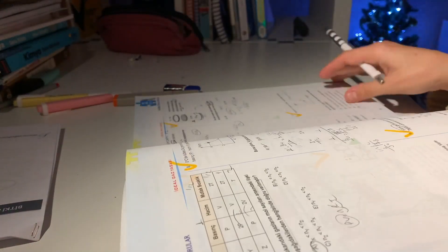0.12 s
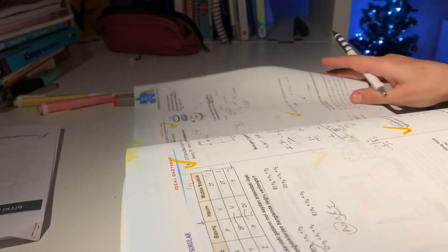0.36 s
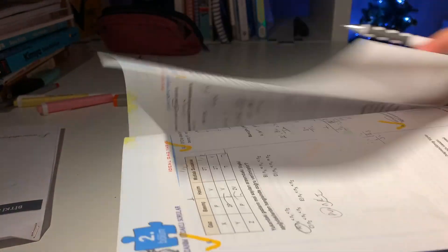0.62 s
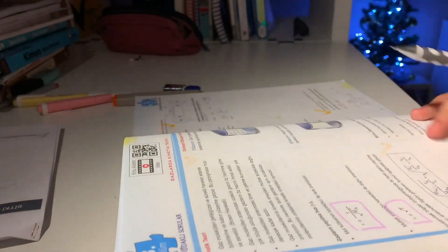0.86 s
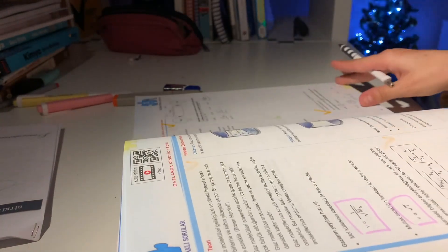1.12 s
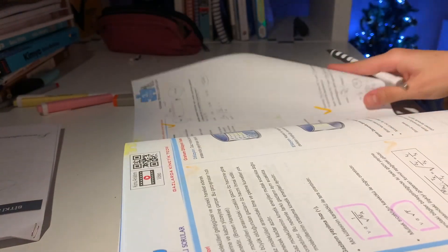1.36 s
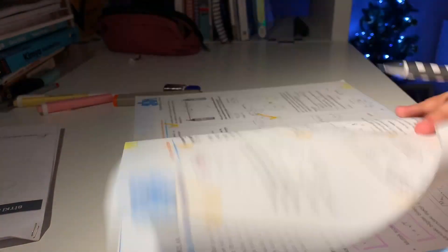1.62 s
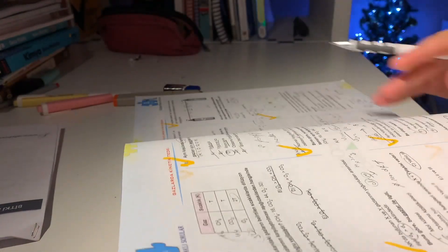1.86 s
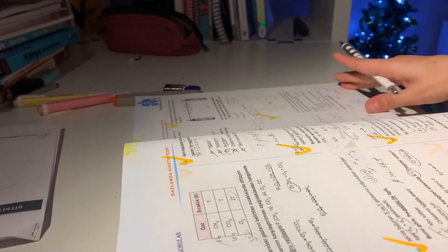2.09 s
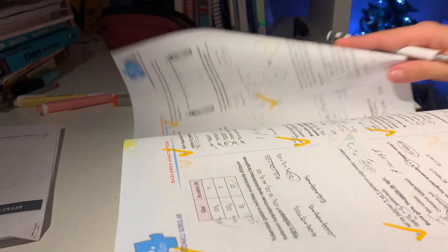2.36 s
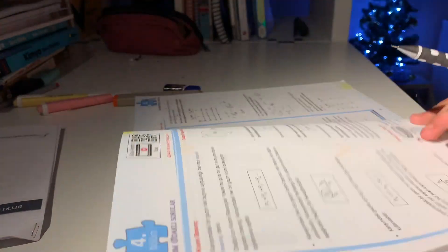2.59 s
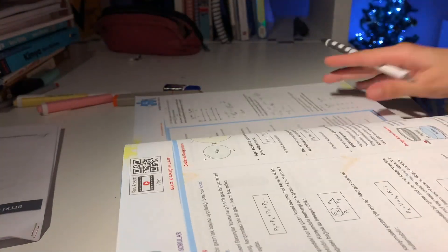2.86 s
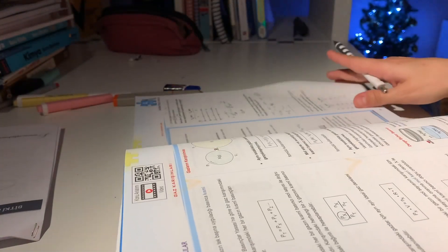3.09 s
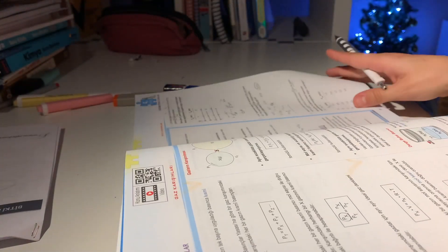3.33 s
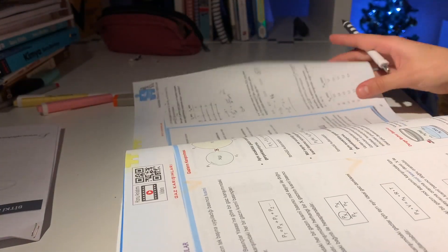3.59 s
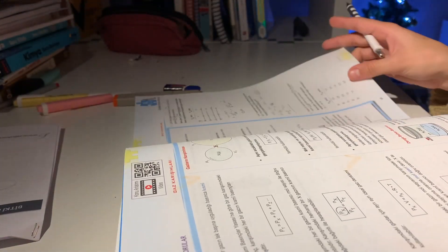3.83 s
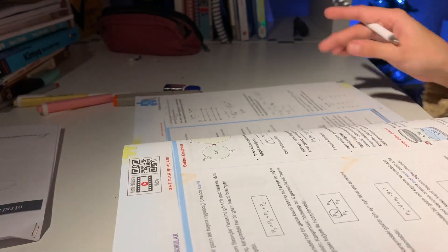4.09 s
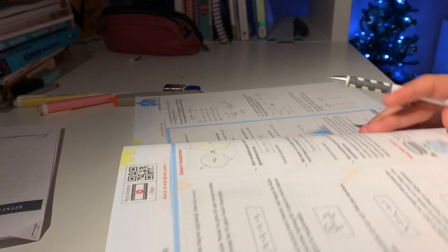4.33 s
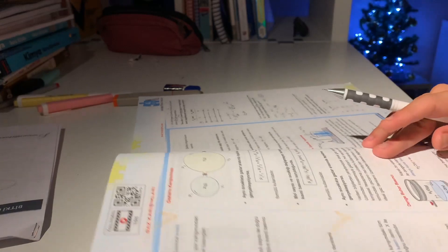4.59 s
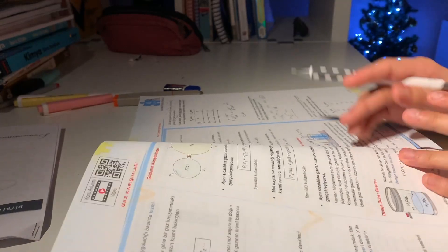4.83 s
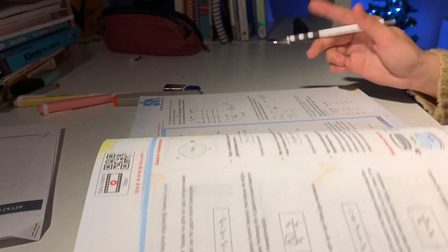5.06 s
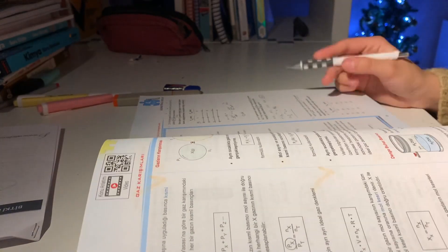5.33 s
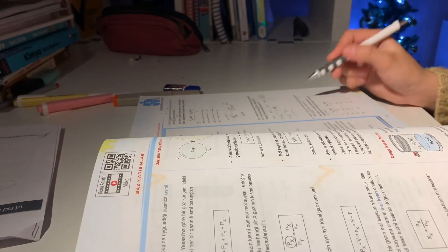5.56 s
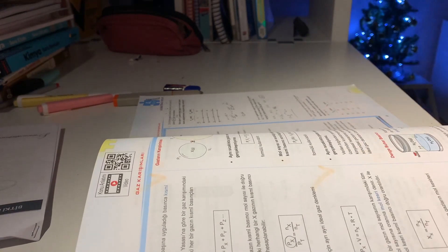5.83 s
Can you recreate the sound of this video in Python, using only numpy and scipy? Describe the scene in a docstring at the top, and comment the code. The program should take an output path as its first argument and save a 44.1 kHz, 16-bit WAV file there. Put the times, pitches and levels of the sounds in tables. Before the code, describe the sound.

Close, dry indoor sound of paper: quick page turns with bright crackles and whooshing rustle, dull low bumps as sheets and hand meet the desk, and fine skin hiss as fingers brush the surface. The first half is lively and loudest around the second and third flips; later come a crisp flick, smaller rustles and soft strokes, fading to faint room hum.

```python
"""At a desk in a house, close to a two-port microphone: a hand with a pen turns and smooths thick book pages.
Fingers hiss and pages drag as granular noise; the bending sheet rustles in coarser grains.
Creases snap as short rings in a flurry of noise, and paper edges scrape in narrow bands of noise.
Fallen pages and the hand thump the desk as low waves sliding down in pitch.
Behind them a low hum of the house, shaped noise, swells slowly under a faint steady hiss."""
import sys
import numpy as np
from scipy import signal
from scipy.fft import rfft, irfft
from scipy.io import wavfile
from scipy.ndimage import uniform_filter1d

SR = 44100
rng = np.random.default_rng(int(sys.argv[2]) if len(sys.argv) > 2 else 0)


def elevation(decibels):
    """Turn decibel levels (scalar or array-like) into linear amplitude ratios."""
    levels = np.asarray(decibels, float)
    return 10 ** (levels / 20)


def store_wav(level_fs):
    """Save 16-bit WAV to argv[1]."""
    pcm = np.round(np.clip(np.atleast_2d(level_fs), -1, 1) * 32767)
    wavfile.write(sys.argv[1], SR, pcm.T.astype(np.int16))


N = 261926  # samples in the scene

# Strokes of the hand over the paper: firmest pressure t/s, rise/s, fall/s,
# drag of page on page level/dB, skin hiss above the drag level/dB
STROKES = [(0.0, 0.025, .12, -62, 3), (.322, .09, 0.88, -60.5, 11.5), (.536, 0.015, 0.41, -52, 2.5),
           (0.734, 0.16, 0.11, -50, 9.5), (.936, 0.15, 0.035, -78, 7), (1.249, 0.032, 1, -60, 10.5),
           (1.487, 0.036, 0.24, -47.5, -3.5), (1.561, 0.036, 0.25, -52.5, 15), (1.65, 0.36, .2, -51, 2.5),
           (1.846, .1, 0.048, -74.5, 7), (1.926, 0.087, 0.094, -84, 5), (2.005, .04, 0.097, -91.5, 12.5),
           (2.139, 0.014, 0.53, -60.5, 3.5), (2.242, 0.098, 0.22, -55, 14), (2.4, 0.29, .1, -62, 11),
           (2.494, 0.063, 0.24, -47.5, 10), (2.829, 0.51, 0.22, -62.5, 2), (2.941, .1, 0.63, -67, 9.5),
           (3.137, 0.097, 0.085, -57, 7), (3.3, 0.15, 0.057, -71, -3), (3.407, 0.05, 0.23, -63, -1),
           (3.52, .12, 0.19, -56.5, -6), (3.6, 0.28, 0.064, -70, 18), (3.636, .015, 0.13, -45, -1.5),
           (3.794, 0.15, 0.21, -61.5, -8), (4.001, 0.39, 0.11, -71.5, 5.5), (4.081, 0.078, 0.075, -68, -7),
           (4.23, 0.15, .25, -70.5, 1.5), (4.34, 0.092, 0.15, -50, 5.5), (4.457, 0.072, 0.11, -61.5, -2.5),
           (4.63, 0.35, 0.77, -64, 3.5), (4.745, 0.027, .2, -67.5, 11.5), (4.812, 0.16, 0.085, -55.5, 4.5),
           (5.013, 0.15, 0.25, -56, 4), (5.31, 0.13, 0.14, -64.5, -3), (5.365, 0.15, 0.027, -72, -8)]
# Bends of the sheet, each a rustle: sharpest bend t/s, rise/s, fall/s, level/dB
BENDS = [(0.0, .02, 0.17, -64), (.51, 0.36, 0.11, -63), (.534, 0.04, 0.28, -47), (.736, 0.44, .12, -50.5),
         (.92, .3, .2, -85), (1.22, 0.26, .2, -89), (1.45, 0.34, .1, -64), (1.485, 0.054, 0.032, -36.5),
         (1.639, 0.35, 0.1, -43), (1.846, 0.12, .12, -71.5), (1.926, .12, .15, -71.5),
         (2.195, .09, 0.13, -67.5), (2.4, 0.13, 0.087, -45.5), (2.495, 0.04, 0.16, -42),
         (2.565, 0.24, 0.06, -41), (2.829, .3, 0.057, -58), (2.941, .12, 0.21, -63.5),
         (3.138, 0.086, 0.13, -63.5), (3.32, .17, 0.11, -66), (3.407, 0.11, .2, -62.5),
         (3.6, 0.28, 0.076, -58), (3.643, 0.028, 0.085, -39.5), (3.794, 0.12, 0.25, -58),
         (4.001, 0.2, 0.41, -66.5), (4.218, 0.4, 0.24, -69), (4.34, 0.078, 0.16, -47),
         (4.457, .1, .18, -76), (4.62, .3, .3, -69), (4.8, 0.37, 0.084, -52), (5.014, .2, .3, -63),
         (5.105, 0.74, 0.18, -55.5), (5.31, 0.6, 0.21, -62.5), (5.621, .5, 0.9, -76.5)]
# Colour of skin sliding on paper: f/Hz, relative density level/dB per Hz
SKIN_SPECTRUM = [(1500, -35.5), (5000, -27.5), (7500, -0.5), (9000, 0.5), (11000, -0.5), (13500, 3),
                 (15800, -11)]
# Colour of page dragging on page: f/Hz, relative density level/dB per Hz
DRAG_SPECTRUM = [(600, -20.5), (1800, -3), (3000, 5), (4300, 6), (6500, -1.5), (9000, -9), (15800, -26.5)]
# Colour of the rustling sheet: f/Hz, relative density level/dB per Hz
SHEET_SPECTRUM = [(150, -27), (400, -1.5), (900, -2.5), (1600, -3), (2400, -3), (4000, -17.5),
                  (16000, -49.5)]
# Creases that flip: onset t/s, level/dB, ring f/Hz, treble relative level/dB, decay of the flurry/ms
SNAPS = [(0.532, -16, 2060, -12.5, 1.3), (0.691, -45, 1639, -22, 14), (0.727, -36.5, 2410, -4, 11),
         (0.739, -34, 2520, 4, 2), (0.747, -39.5, 1600, 14, 2), (0.934, -68.5, 970, 16.5, 4.1),
         (1.453, -31.5, 1370, -25.5, 2.7), (1.480, -12, 1917, -6, 2.56), (1.549, -40, 1280, 5.5, 5.2),
         (1.622, -28.5, 1550, -4.5, 7.2), (1.654, -37, 2540, -17.5, 3.1), (1.6814, -26.5, 2480, 9.5, 1.5),
         (1.705, -37.5, 1080, -22, 4.3), (1.914, -50.5, 550, -15, 7.7), (1.995, -58, 970, -17, 3.2),
         (2.365, -53, 2440, -15.5, 6.5), (2.388, -47, 1500, -15, 4), (2.402, -42, 1980, -13, 5),
         (2.488, -20.5, 1136, -9.5, 4.9), (2.500, -31, 900, 0, 1.5), (2.524, -16.5, 900, -26.5, 2),
         (2.547, -29.5, 1690, -10, 2), (2.595, -43, 1160, 14, 4.4), (3.632, -30.5, 5470, 2.5, 9.2),
         (3.658, -34.5, 1010, -11, 6.2), (3.782, -34, 2070, -4.5, 2.9), (3.821, -40.5, 1515, -41.5, 5),
         (4.073, -46, 1070, 3, 1.8), (4.286, -45, 1060, -7, 10), (4.331, -35.5, 803, -17, 11),
         (4.387, -37, 2600, -3, 2.2), (4.391, -31.5, 1830, -20, 2.7), (4.446, -30, 1244, -6.5, 2.5),
         (4.451, -27, 603, -16, 3.5), (4.613, -39.5, 594, -6, 3.7), (4.793, -42, 600, -16, 10),
         (4.953, -58, 1000, -11, 7.9), (5.057, -35.5, 4000, -4, 1.7)]
# Modes of a flipped crease: factor on the ring frequency, relative level/dB, t60/cycles of the mode
CREASE_MODES = [(0.934, 2, 11.8), (1.525, -16.5, 4.7), (2.181, -3, 41), (0.732, -8.5, 14)]
# Paper edges scraping through a narrow gap that colours them: onset t/s, length/s, f/Hz, width/Hz, level/dB
SCRAPES = [(1.01, 0.06, 4290, 590, -81), (2.531, 0.041, 1600, 250, -46.5), (2.589, 0.13, 1200, 250, -57),
           (2.775, 0.16, 1180, 350, -56.5), (2.79, 0.078, 4500, 600, -66), (2.904, 0.21, 3600, 500, -64.5),
           (2.92, 0.18, 6300, 900, -62), (3.764, 0.11, 4470, 500, -59), (4.594, 0.14, 1240, 298, -63),
           (5.448, 0.25, 2155, 303, -76.5)]
# Pages and hand landing on the desk: onset t/s, level/dB, first f/Hz, last f/Hz, time to the top of the swing/ms
THUMPS = [(0.707, -43, 196, 83, 6.8), (1.628, -37, 263, 108, 14.3), (1.659, -37.5, 201, 61.6, 13.7),
          (1.811, -22.5, 199, 54.4, 18.5), (1.962, -42, 150, 57, 13), (2.487, -19, 1522, 146, 4.5),
          (2.511, -30, 266, 124, 5.2), (2.558, -35.5, 304, 163, 6.5), (2.668, -23, 224, 50.4, 22.5),
          (4.289, -36.5, 197, 66.7, 19.3), (5.338, -42, 119.3, 49.7, 17)]
# Resonances of the house: f/Hz, relative density level/dB per Hz
HUM_SPECTRUM = [(18, -49.5), (30, -17.5), (129, -1), (162, -6), (196, -7.5), (297, -7.5), (335, -11.5),
                (392, -13), (427, -19), (564, -24), (659, -31), (966, -22), (1680, -39), (1900, -62.5),
                (2470, -82), (4180, -120)]
# Swell of the hum: t/s, level/dB
HUM_LEVEL = [(0.0, -57), (1.06, -54), (1.751, -50), (2.07, -54.5), (2.28, -54), (2.58, -46), (2.94, -52.5),
             (4.33, -49.5), (5.94, -49)]
# Left-right likeness of the hum: f/Hz, likeness (0 to 1)
HUM_LIKENESS = [(30, 0.72), (130, 1), (290, 1), (640, 0.34), (1400, 0.17), (3000, 0.12)]
# Dying away of the room: f/Hz, t60/s
ROOM_DECAY = [(200, 0.29), (600, 0.13), (1500, 0.14), (4000, 0.052), (12000, 0.044)]
# Left-right likeness of the room: f/Hz, likeness (0 to 1)
ROOM_LIKENESS = [(200, 0.84), (700, 0.062), (3000, 0), (5500, 0.0056), (7500, 0.33), (16000, .85)]
# Phase by which the left port leads: f/Hz, lead/rad
PORT_LEAD = [(0, .45), (80, .45), (220, .25), (1120, .4), (2200, .5), (2900, 2), (3600, 1.5), (4600, 1.2),
             (6300, 0), (7670, -2.6), (8500, -3.14), (8960, -3.3), (10400, -6), (11600, -6.7),
             (12900, -9.1), (13600, -9.42), (14100, -9.6), (15100, -12.5), (16400, -12.6)]
# Left port over right port: f/Hz, level/dB
PORT_BALANCE = [(60, -1), (700, 0.5), (2000, 1.3), (4400, -2), (8000, -0.5), (16000, 0.5)]


def hand():
    """Skin hisses and pages drag almost evenly, sharing one fine grain; the sheet rustles in coarser grains."""
    drag_db, skin_db = np.transpose(STROKES)[3:, :, None]
    bend_db = np.transpose(BENDS)[3][:, None]
    ease_db = below_top(STROKES, roundness=1.35)
    # the skin hiss follows pressure more steeply than the drag; rest_db is a faint stirring between gestures
    skin_gain = summed(drag_db + skin_db - 1.63 * ease_db, rest_db=-85)
    drag_gain = summed(drag_db - ease_db, rest_db=-92)
    bend_gain = summed(bend_db - below_top(BENDS, roundness=0.88), rest_db=-89)
    friction = swishy(grains(2200, spread_db=1.1, ms=6.3), patchy_db=2.5)
    sheet = swishy(coloured(grains(700, spread_db=1.8, ms=3.2), SHEET_SPECTRUM), patchy_db=4.0)
    skin = evened(coloured(friction, SKIN_SPECTRUM)) * skin_gain
    drag = evened(coloured(friction, DRAG_SPECTRUM)) * drag_gain
    return skin + drag + evened(sheet) * bend_gain


def below_top(rows, roundness):
    """Each gesture climbs to its top, then falls: the dB it lies below; roundness 1 is pointed, 2 round."""
    t = np.arange(0, N + 64, 64) / SR
    top_s, rise_s, fall_s = np.array([row[:3] for row in rows]).T[:, :, None]
    before = (top_s - t) / np.maximum(rise_s, .005)
    after = (t - top_s) / np.maximum(fall_s, .005)
    span_db = 30  # level covered in one rise or fall time
    return span_db * np.where(t < top_s, before, after) ** roundness


def summed(levels_db, rest_db):
    """Gestures add by power over a resting level; returns a gain per sample."""
    gain = np.sqrt((elevation(levels_db) ** 2).sum(0) + elevation(rest_db) ** 2)
    return np.interp(np.arange(N), np.arange(len(gain)) * 64, gain)


def grains(per_s, spread_db, ms):
    """Noise under a flurry of random bursts, each decaying exponentially over ms."""
    size_db = spread_db * np.minimum(rng.exponential(1, N), 4)
    strikes = elevation(size_db) * (rng.random(N) < per_s / SR)
    bursts = signal.lfilter([1], [1, -np.exp(-1000 / (ms * SR))], strikes)
    return bursts * rng.standard_normal(N)


def swishy(x, patchy_db):
    """Tints a noise with patches that drift in time and frequency."""
    z = signal.stft(x, nperseg=256)[2]
    patches = uniform_filter1d(rng.standard_normal(z.shape), 5, 0)
    patches = evened(uniform_filter1d(patches, 24, 1))
    return signal.istft(z * elevation(patchy_db * patches), nperseg=256)[1][:N]


def snaps():
    """Each crease gives way within a moment and rings for a few cycles inside a short flurry of noise."""
    out, t = np.zeros(N), np.arange(4096) / SR
    noises = rng.standard_normal((len(SNAPS), 2, len(t)))
    for (s, db, hz, treble_db, ms), (low, high) in zip(SNAPS, noises):
        rise_ms = 0.095 + 0.28 * ms  # the crease gives way more slowly when its flurry is long
        rise = np.sin(np.pi / 2 * np.minimum(1000 * t / max(rise_ms, .1), 1)) ** 2
        after = np.maximum(t - rise_ms / 1000, 0)
        ring = np.zeros(len(t))
        for factor, mode_db, cycles in CREASE_MODES:
            decay = elevation(mode_db - 60 * after * hz * factor / cycles)
            ring += decay * np.sin(2 * np.pi * factor * hz * t + np.pi * factor ** 2)
        body = evened(coloured(low, [(hz / 3, -28), (hz, 0), (hz * 1.43, -8), (20000, -45)]))
        treble = evened(coloured(high, [(2500, -31), (5000, 57.5), (11000, 58), (16000, 50.5)]))
        fade = np.exp(-1000 * after / max(ms, .5))
        flurry = fade * (0.37 * body + 0.47 * elevation(treble_db) * treble)
        add(out, s, elevation(db) * rise * (0.42 * ring + flurry))
    return out


def scrapes():
    """Paper edges scrape as soft swells of noise in one narrow resonance each."""
    out = np.zeros(N)
    noises = rng.standard_normal((len(SCRAPES), SR // 2))
    for (s, length_s, hz, width, db), noise in zip(SCRAPES, noises):
        gap = [(hz - 2 * width, -30), (hz - width / 2, -3), (hz + width / 2, -3), (hz + 2 * width, -30)]
        count = round(length_s * SR)
        add(out, s, elevation(db) * evened(coloured(noise, gap))[:count] * np.hanning(count))
    return out


def thumps():
    """A bending wave whose fast highs come first: it slides down in pitch, with a faster ripple early on."""
    out, t = np.zeros(N), np.arange(SR // 4) / SR
    for s, db, first_hz, last_hz, ms in THUMPS:
        u = 1000 * t / ms  # 1 at the top of the swing
        hz = last_hz + (first_hz - last_hz) * np.exp(-u / 0.48)
        phase = 2 * np.pi * np.cumsum(hz) / SR
        swing = (u * np.exp(1 - u)) ** 2.62
        ripple = 0.61 * np.exp(-u / 3.9) * np.sin(2.4 * phase)
        add(out, s, elevation(db) * swing * (np.sin(phase) + ripple))
    return out


def room(x):
    """Sparse taps of random sign, each band dying at its own speed; the close ports share the treble."""
    taps = np.zeros((2, SR // 2))
    at = np.arange(100, SR // 2 - 20, 20)
    at = at + rng.integers(0, 20, (2, len(at)))
    np.put_along_axis(taps, at, rng.choice([-1., 1.], at.shape), 1)
    hz, t, z = signal.stft(taps, SR, nperseg=256)
    same = np.clip(read(ROOM_LIKENESS, hz), 0, 1)[:, None]
    z = np.array([z[0], same * z[0] + np.sqrt(1 - same ** 2) * z[1]])
    decay = elevation(-60 * t / read(ROOM_DECAY, hz)[:, None])
    tail = signal.istft(z * decay, SR, nperseg=256)[1]
    return signal.fftconvolve(x[None], tail / np.linalg.norm(tail[0]), axes=1)[:, :N]


def hum():
    """Low noise in the resonances of the house, nearly alike at both ports in the bass, wavering in patches."""
    frames, hz = N // 512 + 5, np.fft.rfftfreq(2048, 1 / SR)
    a, b, c, d, patches = rng.standard_normal((frames, 1025, 5)).T
    patches = evened(uniform_filter1d(uniform_filter1d(patches, 4, 0), 6, 1))
    same = np.clip(read(HUM_LIKENESS, hz), -1, 1)[:, None]
    left, other = a + 1j * b, c + 1j * d
    z = np.array([left, same * left + np.sqrt(1 - same ** 2) * other])
    z *= elevation(read(HUM_SPECTRUM, hz)[:, None] + 2.6 * patches)
    noise = signal.istft(z, nperseg=2048, noverlap=1536)[1][:, :N]
    s, db = np.transpose(HUM_LEVEL)
    return evened(noise) * elevation(np.interp(np.arange(N) / SR, s, db))


def hiss():
    """Faint steady treble of the air in the room, as shaped noise."""
    spectrum = [(1500, -27), (3000, 16.5), (12000, -17.0), (16000, 3)]
    return elevation(-101) * evened(coloured(rng.standard_normal(N), spectrum))


def evened(x):
    """Scales to rms 1."""
    return x / np.sqrt(np.mean(x ** 2) + 1e-20)


def read(points, hz):
    """Reads a table of values over frequency on a log-frequency axis."""
    f, value = np.transpose(points)
    return np.interp(np.log(hz + 1), np.log(f + 1), value)


def coloured(x, points):
    """Filters by a spectrum table."""
    gain = elevation(read(points, np.fft.rfftfreq(x.shape[-1], 1 / SR)))
    return irfft(rfft(x) * gain, x.shape[-1])


def add(mix, s, sound):
    """Mixes a sound in at a time in seconds."""
    part = mix[round(s * SR):][:len(sound)]
    part += sound[:len(part)]


def scene():
    """Paper heard direct and through the room, with desk thumps, hum and hiss."""
    paper = hand() + snaps() + scrapes()
    return paper + thumps() + elevation(-8.0) * room(paper) + hum() + hiss()


def ports(x):
    """The two ports differ in level and by a phase gap that grows in the treble; the band ends at an edge."""
    hz, (f, lead) = np.fft.rfftfreq(N, 1 / SR), np.transpose(PORT_LEAD)
    # each port takes half of the phase gap and half of the balance
    half = np.exp(.5j * np.interp(hz, f, lead)) * elevation(read(PORT_BALANCE, hz) / 2)
    edge = elevation(-np.clip((hz - 15950) / 25, 0, 80))  # 1 dB down per 25 Hz above 15950 Hz
    bass = 1 / (1 + (34 / (hz + 1)) ** 4)  # the capsule also loses the deep bass
    return irfft(rfft(x) * edge * bass * np.array([half, 1 / half]), N)


def low_pass(x):
    """Removes everything above the highest recorded frequency."""
    return signal.sosfilt(signal.butter(12, 16790, fs=SR, output="sos"), x)


def record(dry):
    """The close microphone takes the scene in through its two ports."""
    mix = ports(dry)
    return low_pass(mix)


dry = scene()
out = record(dry)
store_wav(out)
```